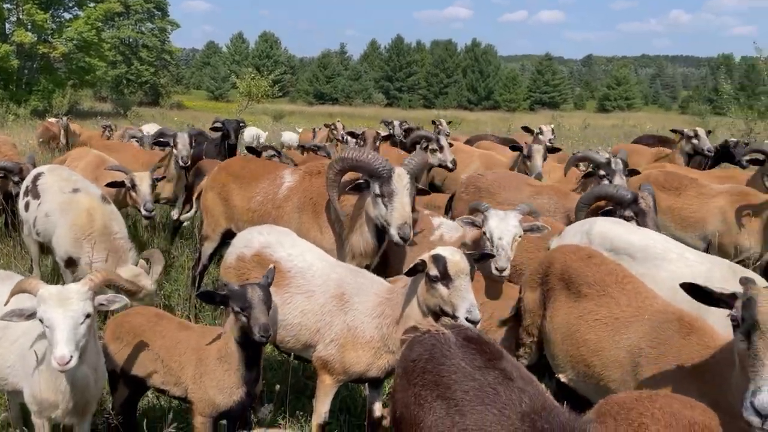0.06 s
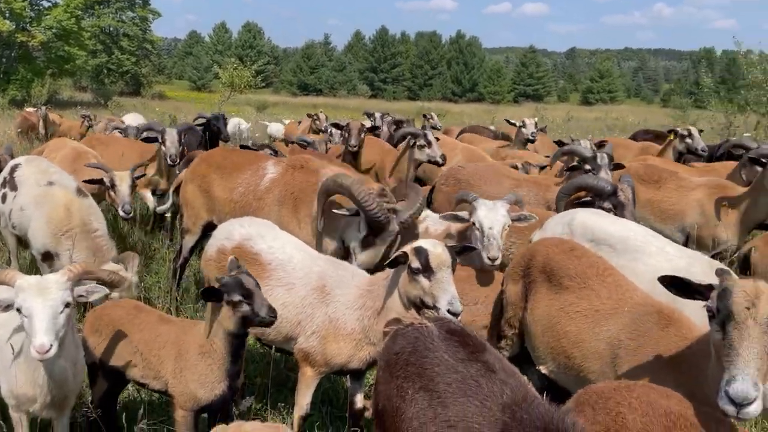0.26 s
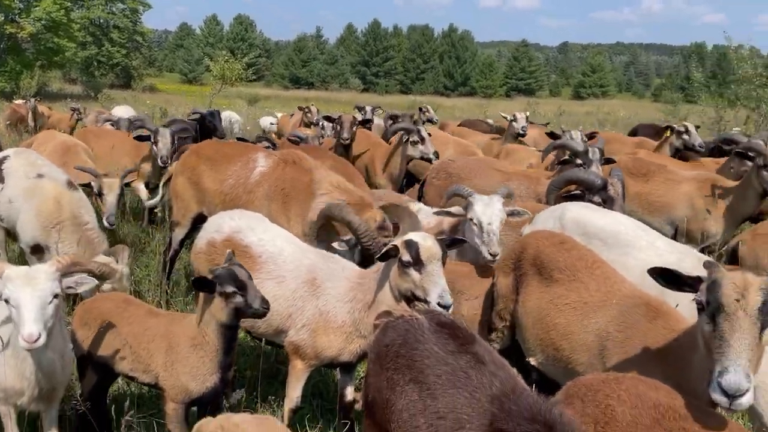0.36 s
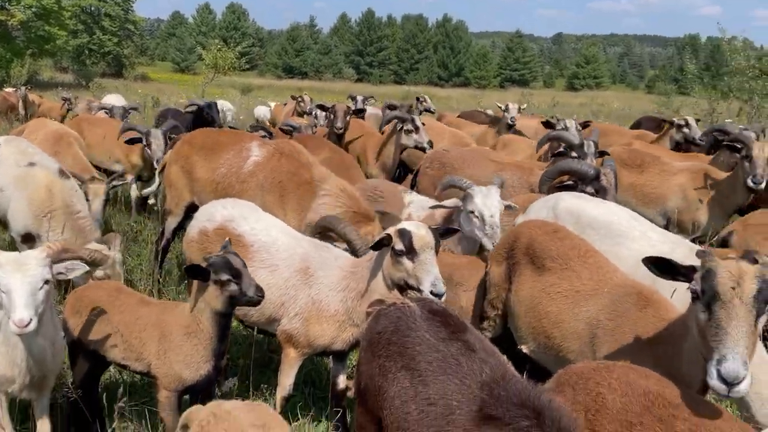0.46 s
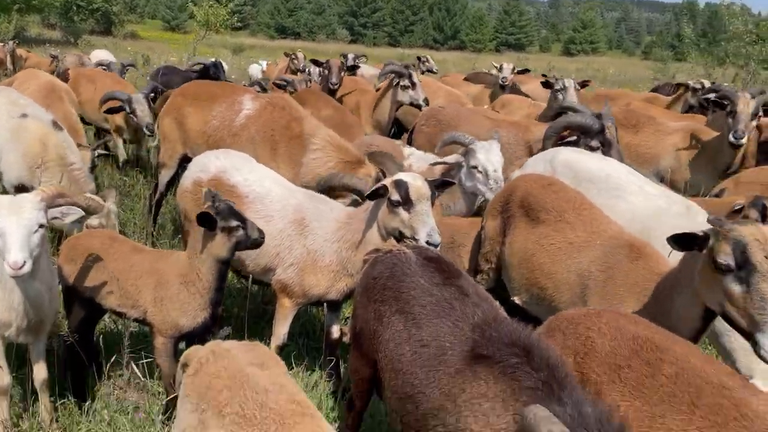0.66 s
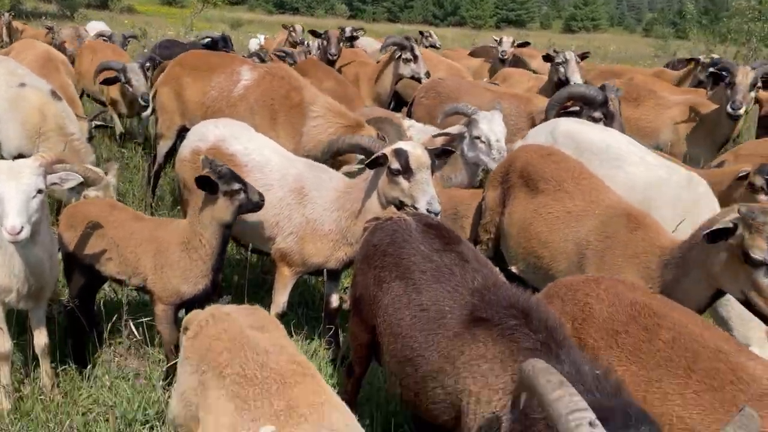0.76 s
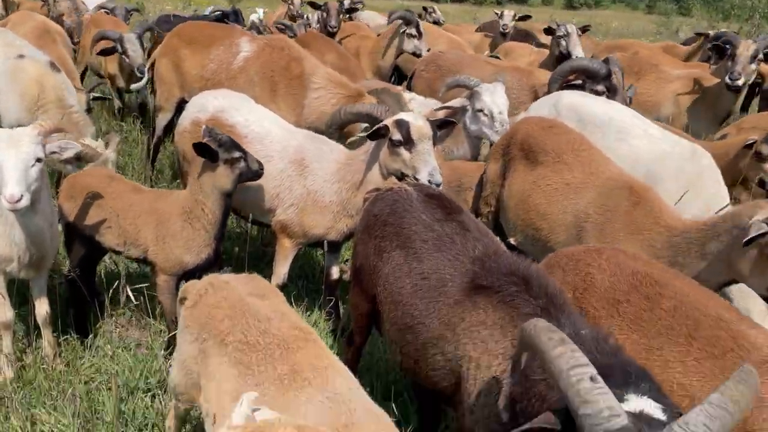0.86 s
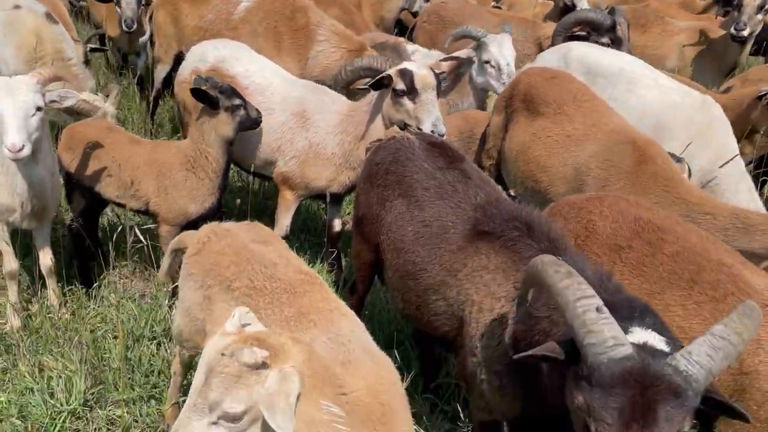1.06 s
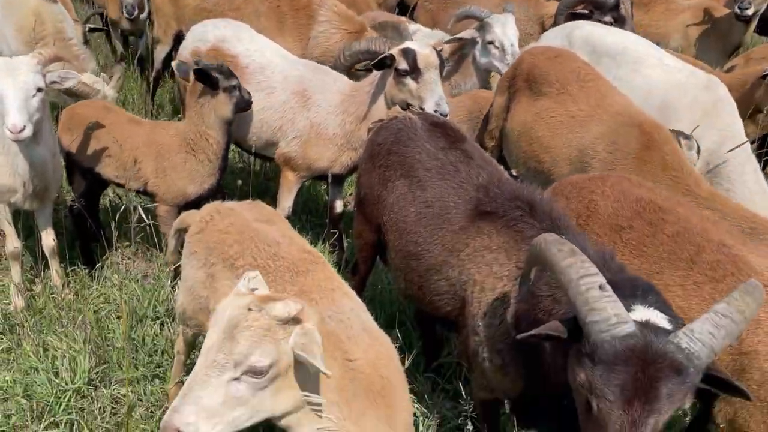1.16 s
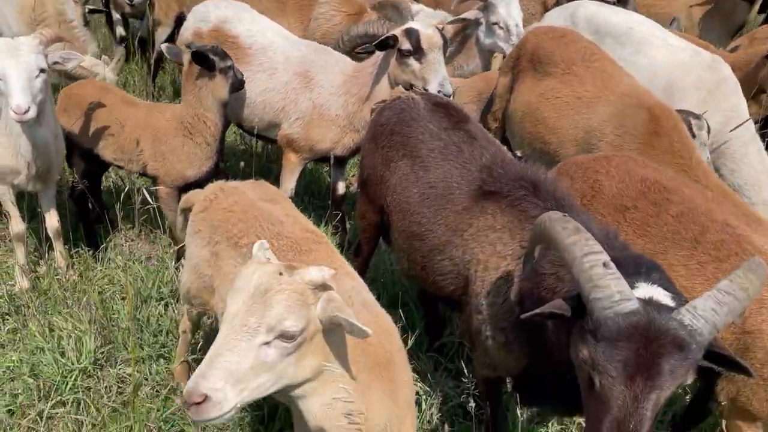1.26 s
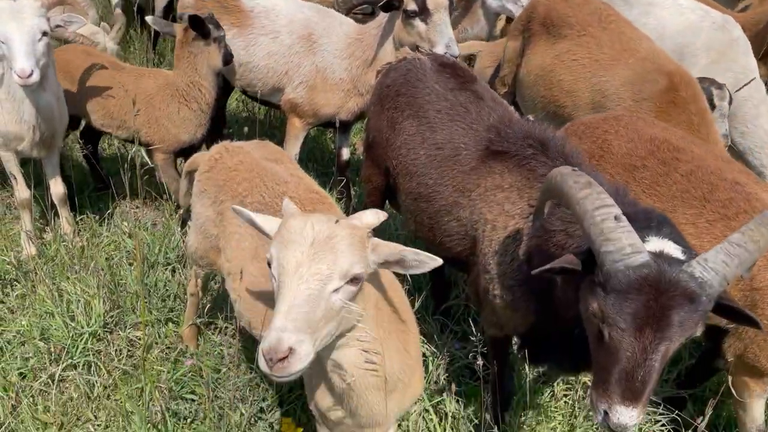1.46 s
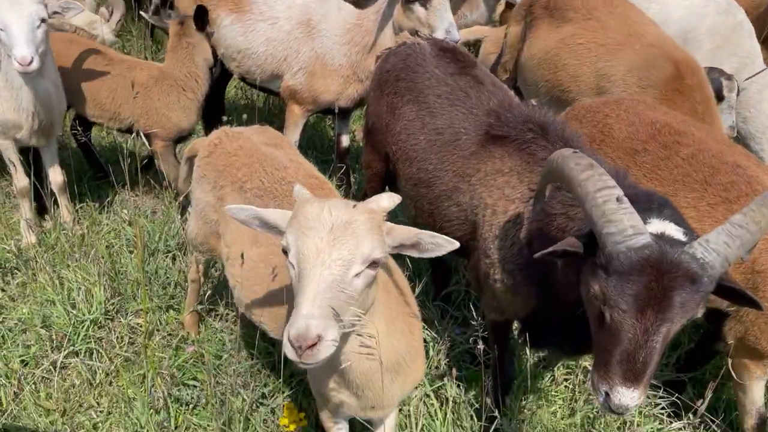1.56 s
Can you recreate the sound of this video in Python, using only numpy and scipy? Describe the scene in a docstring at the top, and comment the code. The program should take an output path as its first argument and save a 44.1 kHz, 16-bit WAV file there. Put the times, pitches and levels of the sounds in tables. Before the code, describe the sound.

One short, stuttering sheep bleat over light wind, then soft treading through grass.

```python
"""A sheep in a flock on open pasture. Light wind rumbles on the microphone over a faint hiss throughout.
The sheep starts one quavering bleat with a double croak through the nose; then its mouth opens.
Each quick throat pulse rises in pitch and ends in a rough catch. A weak last groan follows as the
jaw shuts. After it, hooves tread on and snap grass stalks."""
import sys
import numpy as np
from scipy import signal
from scipy.fft import rfft, irfft
from scipy.io import wavfile
from scipy.ndimage import uniform_filter1d

SR = 44100
rng = np.random.default_rng(int(sys.argv[2]) if len(sys.argv) > 2 else 0)


def pcm_store(signal):
    """Save signal as 16-bit PCM."""
    levels = np.round(np.clip(np.atleast_2d(signal), -1, 1) * 32767)
    wavfile.write(sys.argv[1], SR, levels.astype(np.int16).T)


N = 70560
CYCLE_SAMPLES = 2048

# Throat pulses: start_s, length_s, pitch_hz, level_db, chest_db, attack_s, tuning_ratio,
# upper_tuning_ratio, sag_share, edge_hz, roughness_share, catch_db, hiss_db
PULSES = [ (0.2261, 0.0167, 272, -43.5, 1, .002, 1.154, 1.0, .0, 2620, 0.8, 2, -62),
          (0.2478, 0.014, 237.2, -38.5, 2.5, 0.003, 1.051, 0.74, 0.0039, 3120, .55, 7.5, -62),
          (0.3234, 0.038, 216.4, -35.5, -2, 0.016, 0.99, 0.91, 0.028, 5050, 0.18, 3, -55.5),
          (0.4109, 0.04653, 219.1, -35, -0.5, 0.02, 0.96, 0.96, 0.054, 4970, 0.04, 1, -55.5),
          (0.499, 0.0481, 221.7, -32, -0.5, 0.029, 0.99, .96, 0, 4370, 0.1, 5, -54.5),
          (0.592, 0.048, 220, -31, -1, 0.014, 0.998, 0.965, 0, 5160, 0.12, 4, -57.5),
          (0.686, 0.047, 219.2, -32.5, 1, 0.0094, 0.99, 1.024, 0.028, 5700, 0.03, 3.5, -53),
          (0.742, 0.033, 255.3, -50.5, 2, 0.0031, 1.036, 1.4, 0.0084, 4700, 0.72, -0.5, -61.5), ]
def bleat():
    """A run of throat pulses plus breath."""
    return sum(throat_pulse(*row) for *row, _ in PULSES) + breath()


# Jaw motion: time_s, opening_share
JAW = [(.47, 0), (.502, 0.41), (.538, 0.71), (.553, 0.97), (.62, 0.94), (.757, 0.98), (.773, 0.05)]
def throat_pulse(start_s, length_s, pitch_hz, level_db, chest_db, attack_s,
                 tuning, upper_tuning, sag, edge_hz, roughness, catch_db):
    """One pulse, cycle by cycle: starts thin, rises and fills out, chokes off in a rough catch."""
    chest_hz, soft_hz = 1050, 2860
    catch_s, release_s, jitter_share = .0055, .0031, .13
    out, age_s, f = np.zeros(N), 0, bins(CYCLE_SAMPLES)
    bass = 1 / (1 + (f / chest_hz) ** 6)
    treble = 1 - 1 / (1 + (f / soft_hz) ** 6)
    rolloff = 1 / np.sqrt(1 + (f / edge_hz) ** 10)
    for jitter, shimmer in rng.standard_normal((18, 2)):
        progress, at = age_s / length_s, (start_s + age_s) * SR
        rise = (1 + np.tanh((progress - .48) / .07)) / 2
        hz = pitch_hz * (1 + .1 * rise)
        catch = np.exp(-(min(age_s - length_s, 0) / catch_s) ** 2 / 2)
        rough = np.clip(roughness + .5 * catch ** 2, 0, 1)
        chest_onset_db = -36.5 * max(1 - age_s / (attack_s * 1.53), 0) ** 2
        buzz_onset_db = -9.5 * max(1 - age_s / attack_s, 0) ** 2
        soft_db = -11.5 * treble * bump(progress, .66, .35)  # folds close more softly mid-pulse
        chest = bass * undb(chest_db + chest_onset_db + .5 * catch)
        buzz = (1 - bass) * undb(buzz_onset_db + catch_db * catch + soft_db)
        opening = np.interp(start_s + age_s, *np.array(JAW).T)
        sagged_tuning = tuning * (1 - sag * (min(progress, 1) - .5))
        tract = vocal_tract(opening, sagged_tuning, upper_tuning)
        cycle = ring(fold_closure(at % 1, hz, rough, shimmer), tract * rolloff * (chest + buzz))
        release = np.exp(-max(age_s - length_s, 0) / release_s)
        out[int(at):int(at) + CYCLE_SAMPLES] += undb(level_db) * release * cycle
        age_s += np.clip(1 + jitter_share * rough * jitter, .75, 1.4) / hz
    return out


def fold_closure(offset_samples, pitch_hz, rough, shimmer):
    """The vocal folds close once: a rounded click, then a brighter puff of air."""
    click_hz, air_hz, puff_cycles = 3700, 3200, 1.22
    n, f = np.arange(CYCLE_SAMPLES) - 8 - offset_samples, bins(CYCLE_SAMPLES)
    period = SR / pitch_hz
    impulse = np.sinc(n) * np.exp(-(n / 5) ** 2)
    click = undb(-rough * shimmer) * ring(impulse, 1 / np.sqrt(1 + (f / click_hz) ** 8))
    puff = rng.standard_normal(CYCLE_SAMPLES) * np.exp(-n / period / puff_cycles) * 2 / np.sqrt(period)
    hiss = undb(-9.5) * (1 - rough / 2) * ring(puff, f / np.hypot(f, air_hz))
    rasp = undb(-4) * rough * puff
    return (click + hiss + rasp) * period / np.sqrt(2)


# Resonances, mouth shut: centre_hz, width_hz, gain_db
NOSE_FORMANTS = [(238.6, 87, 2), (658, 118, -9), (1045, 140, -10.5), (1444, 220, -19.5), (2312, 146, -14),
                 (2840, 160, -22.5), (3670, 95, -14.5), (4125, 120, -16)]
# Resonances, mouth open: centre_hz, width_hz, gain_db
MOUTH_FORMANTS = [(248, 270, -15.5), (472, 44, -13), (717, 80.6, 2), (1390, 250, -11), (1567, 128, -3.5),
                  (2030, 590, -26.5), (2680, 93, -11.5), (2790, 99, -4.5), (3310, 205, -14.5),
                  (3820, 117, -11), (4030, 130, -17.5), (4680, 120, -21.5)]
def vocal_tract(opening, tuning, upper_tuning):
    """Nose and mouth resonances, blended by jaw opening; shutting bends the mouth's apart."""
    jaw_hz, lip_hz, upper_hz = 710, 2830, 3100
    near = lambda hz, centre_hz: bump(np.log(hz / centre_hz), 0, .2)
    bend = lambda hz: 1 + (1 - opening) * (.13 * near(hz, lip_hz) - .56 * near(hz, jaw_hz))
    tuned = lambda hz: hz * (upper_tuning if hz > upper_hz else tuning)
    power = lambda hz, width_hz, db: (undb(db) * resonance(hz, width_hz, CYCLE_SAMPLES)) ** 2
    nose = sum(power(tuned(hz), width, db) for hz, width, db in NOSE_FORMANTS)
    mouth = sum(power(tuned(hz) * bend(hz), width, db) for hz, width, db in MOUTH_FORMANTS)
    floor = power(hz=2200, width_hz=7200, db=-27.5)
    return np.sqrt((1 - opening) ** 2 * nose + opening * mouth + floor)


# Breath hiss spectrum: freq_hz, gain_db
HISS_SPECTRUM = [(1000, 10), (2500, 7.5), (4000, 12), (6000, -2), (10500, 3), (16000, -10)]
def breath():
    """Steady air rings the open mouth; a thin hiss leads into each pulse."""
    t, highpass_hz = np.arange(N) / SR, 2390
    mouth = sum(undb(db) * resonance(hz, width) for hz, width, db in MOUTH_FORMANTS)
    opening = np.interp(t, *np.array(JAW).T, left=0, right=0)
    flow = undb(-57) * opening * noise(mouth / np.hypot(1, (highpass_hz / bins()) ** 4))
    spurts = sum(undb(hiss_db) * bump(t, start_s + .23 * length_s, .49 * length_s)
                 for start_s, length_s, *_, hiss_db in PULSES)
    return flow + spurts * noise(colour(HISS_SPECTRUM))


# Voice stereo balance: freq_hz, left_minus_right_db
VOICE_BALANCE = [(100, -2.5), (700, -2.9), (1000, -3), (1600, -5), (2600, -6), (4100, -4)]
def sheep():
    """The bleat, slightly right, mirrored by the ground and scattered off the flock."""
    t, scatter_t60_s = np.arange(N) / SR, .3
    voice = rfft(bleat())
    delay = lambda lag_s: np.exp(-2j * np.pi * bins() * lag_s)
    lean = np.sqrt(colour(VOICE_BALANCE))
    direct = np.array([lean * delay(.000012), 1 / lean])
    ground = 1 + undb(-20) * delay(.00169)
    smear = delay(.002 * np.tanh(bins() / 6040))  # treble lags bass, rounding each click
    tail = rng.standard_normal((2, N)) * undb(-60 * t / scatter_t60_s) * (t > .004)
    scatter = undb(-26) * rfft(unit(tail)) / np.sqrt(N)
    return irfft(voice * (direct * ground * smear + scatter), N)


# Snapping stalks: start_s, level_db, centre_hz
SNAPS = [(0.824, -55, 3970), (0.8393, -51.5, 3900), (0.9215, -47, 3200), (0.9313, -46.5, 2900),
         (0.9369, -45.5, 3300), (1.544, -48, 3070), (1.575, -52, 1790), (1.5854, -51, 2850)]
# Hoof treads: start_s, level_db, centre_hz, decay_s
TREADS = [(0.178, -58.5, 1830, 0.014), (0.782, -52, 111, 0.052), (0.848, -45.5, 1050, 0.002),
          (0.8498, -45.5, 407, 0.0049), (1.028, -60, 2030, 0.012), (1.045, -56.5, 895, 0.0053),
          (1.245, -60, 484, 0.012), (1.406, -61.5, 704, 0.024), (1.462, -59, 483, 0.012),
          (1.499, -64, 270, 0.025), (1.578, -64, 453, 0.028)]
def hooves():
    """Stalks snap with a short crunch; hooves land dully in turf."""
    snaps = treads = 0
    for start_s, db, hz in SNAPS:
        crack, crunch = fade(start_s, decay_s=.0012), undb(-16.5) * fade(start_s, decay_s=.015)
        snaps += undb(db) * noise(resonance(hz, .66 * hz)) * (crack + crunch)
    for start_s, db, hz, decay_s in TREADS:
        treads += undb(db) * noise(resonance(hz, .76 * hz)) * fade(start_s, decay_s)
    return pan(snaps, -10) + pan(treads, -8)


# Leg swishes: peak_s, level_db, half_length_s
RUSTLES = [(0.155, -59.5, .012), (0.87, -57.5, .01), (0.934, -55, 0.024), (0.984, -60, 0.045),
           (1.144, -60.5, 0.087), (1.453, -61.5, .02), (1.575, -64, 0.035)]
# Swish spectrum: freq_hz, gain_db
RUSTLE_SPECTRUM = [(500, 7), (1500, 4), (3000, 3), (6000, -14.5), (10500, 7), (13000, 1.5), (16000, 0)]
def rustles():
    """Legs brush through grass in soft, wide swishes."""
    t = np.arange(N) / SR
    brush = sum(undb(db) * bump(t, peak_s, half_s) for peak_s, db, half_s in RUSTLES)
    return brush * np.array([noise(colour(RUSTLE_SPECTRUM)) for _ in range(2)])


# Crackle spectrum: freq_hz, gain_db
CRACKLE_SPECTRUM = [(200, 6), (800, -4), (3000, 2), (6000, 0), (12000, 3), (16000, -6)]
def grass_crackle(rate_per_s=300, spread_db=15, level_db=-73.5):
    """Grass crackles faintly under the walking flock."""
    ticks = (rng.random((2, N)) < rate_per_s / SR) * rng.choice([-1, 1], (2, N))
    sizes = undb(spread_db * np.minimum(rng.exponential(size=(2, N)), 3))
    crack = noise(colour(CRACKLE_SPECTRUM)) * fade(0, decay_s=.0012)
    return undb(level_db) * unit(irfft(rfft(ticks * sizes) * rfft(crack), N))


# Gust envelope: time_s, level_db
GUSTS = [(0.0, -53.5), (0.057, -46), (0.172, -62), (0.198, -49.5), (0.378, -59.5), (0.396, -48),
         (0.462, -45.5), (0.502, -55.5), (0.836, -55), (1.056, -60.5), (1.104, -54), (1.22, -51.5),
         (1.318, -64.5), (1.448, -59.5), (1.484, -54.5), (1.6, -55)]
# Rumble spectrum: freq_hz, gain_db
WIND_SPECTRUM = [(20, -8), (35, -22), (52, 2.5), (80, -1.5), (120, -6.5), (200, -15), (300, -40),
                 (600, -49.5)]
def wind():
    """Gusts rumble on the microphone."""
    gust = undb(np.interp(np.arange(N) / SR, *np.array(GUSTS).T))
    mid = noise(colour(WIND_SPECTRUM))
    side = undb(-6.5) * noise(colour(WIND_SPECTRUM))
    return gust * np.array([mid + side, mid - side])


# Field hiss spectrum, mid channel: freq_hz, gain_db
FIELD_MID = [(60, -22), (150, -1), (300, -2.5), (600, -10), (1200, -15.5), (2500, -15), (4500, -14),
             (7500, -25), (11000, -12), (16000, -33)]
# Field hiss spectrum, side channel: freq_hz, gain_db
FIELD_SIDE = [(60, -41), (150, -10), (400, -7.5), (1200, -14), (3000, -14.5), (5000, -14.5), (6500, -9.5),
              (8300, 1), (9300, -6), (11000, -35.5), (14000, -12), (16000, -2.5)]
def field_hiss():
    """Faint, wide hiss; the level wanders and the side channel flickers."""
    swell = undb(.62 * wander(rate_hz=13.34))
    mid = undb(-61) * noise(colour(FIELD_MID))
    side = undb(-54.5 - 3.5 * wander(rate_hz=47)) * noise(colour(FIELD_SIDE))
    return swell * np.array([mid + side, mid - side])


def undb(db):
    """Decibels to gain."""
    return 10 ** (np.asarray(db) / 20)


def unit(x):
    """Scale to rms 1."""
    return x / np.sqrt(np.mean(x ** 2))


def bins(size=N):
    """FFT frequencies in Hz, floored at 1."""
    return np.maximum(np.arange(size // 2 + 1) * SR / size, 1)


def colour(points):
    """Gain per bin from (freq_hz, gain_db) points."""
    hz, db = np.array(points).T
    return undb(np.interp(np.log(bins()), np.log(hz), db))


def noise(gain):
    """Shaped noise, rms 1."""
    return unit(irfft(rfft(rng.standard_normal(N)) * gain, N))


def ring(x, gain):
    """Minimum-phase filter from gain per bin."""
    cepstrum = irfft(np.log(gain + 1e-6))
    cepstrum[1:len(x) // 2] *= 2
    cepstrum[len(x) // 2 + 1:] = 0
    return irfft(rfft(x) * np.exp(rfft(cepstrum)))


def resonance(hz, width_hz, size=N):
    """Gain of one steep resonance."""
    f = bins(size)
    return 1 / (1 + ((f * f - hz * hz) / (f * width_hz)) ** 2 / 2)


def wander(rate_hz):
    """Smooth random drift, rms 1."""
    hold = int(SR / rate_hz)
    steps = np.repeat(rng.standard_normal(N // hold + 1), hold)
    return unit(uniform_filter1d(uniform_filter1d(steps, hold), hold)[:N])


def bump(x, centre, half_width):
    """Gaussian, peak 1."""
    return np.exp(-((x - centre) / half_width) ** 2)


def fade(start_s, decay_s):
    """Sudden start, exponential decay."""
    age_s = np.arange(N) / SR - start_s
    return (age_s >= 0) * np.exp(-np.abs(age_s) / decay_s)


def pan(x, left_minus_right_db):
    """Mono to stereo by level."""
    return x * undb(np.array([[left_minus_right_db], [-left_minus_right_db]]) / 2)


def scene():
    """Stereo mix of sheep and pasture."""
    return sheep() + hooves() + rustles() + grass_crackle() + wind() + field_hiss()


def record(dry, cutoff_hz=15800):
    """Steep low-pass."""
    return signal.sosfilt(signal.ellip(8, .2, 70, cutoff_hz, fs=SR, output="sos"), dry)


dry = scene()
out = record(dry)
pcm_store(out)
```